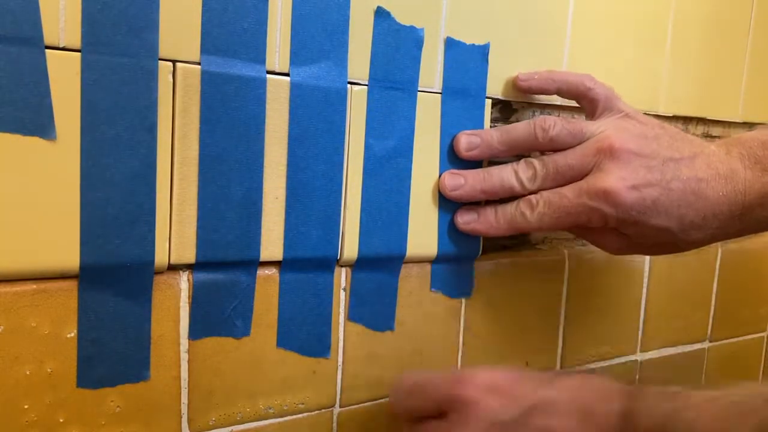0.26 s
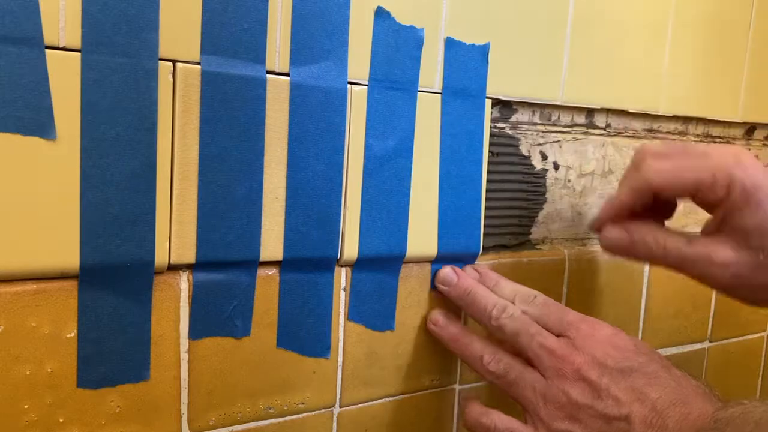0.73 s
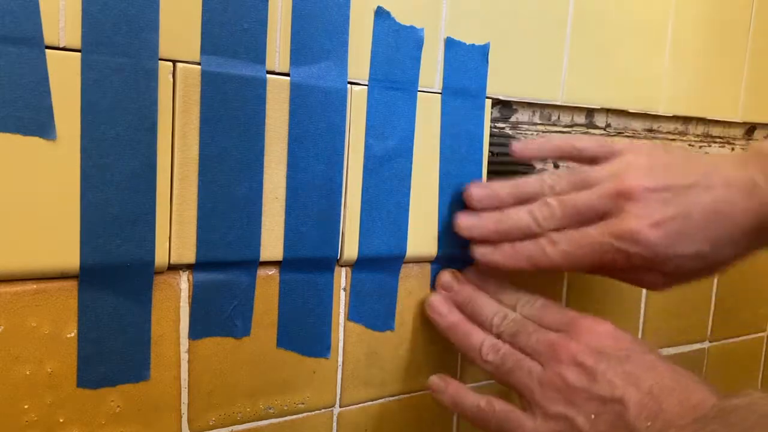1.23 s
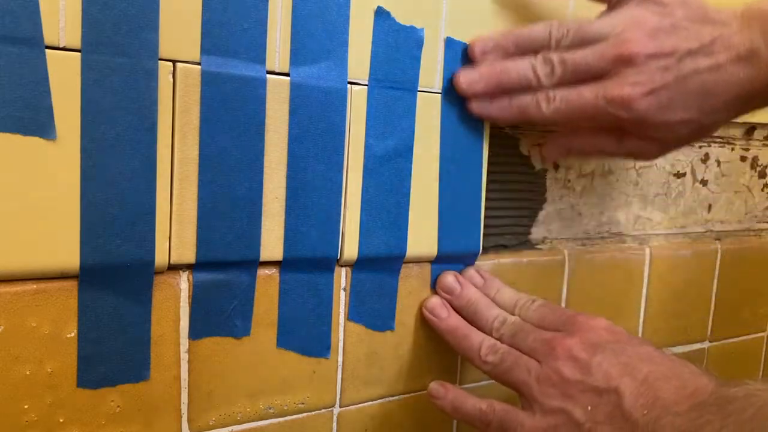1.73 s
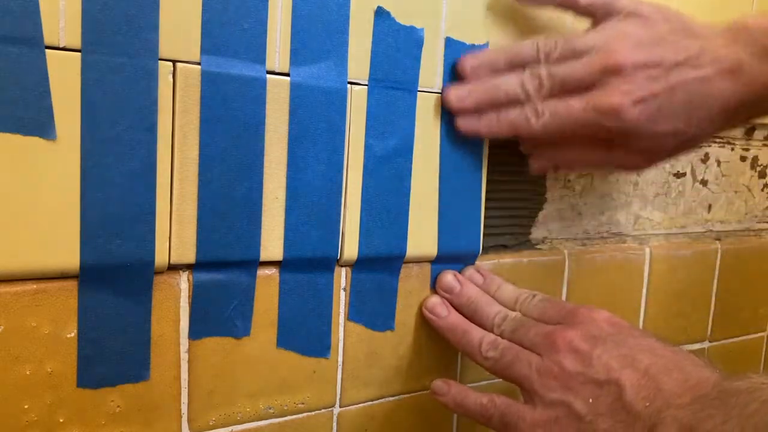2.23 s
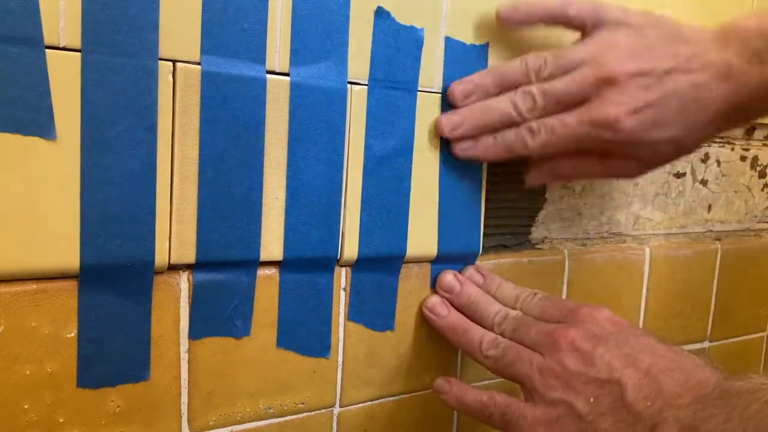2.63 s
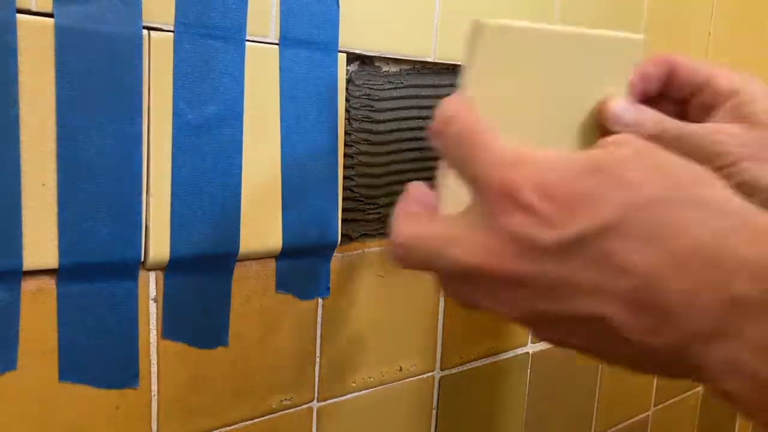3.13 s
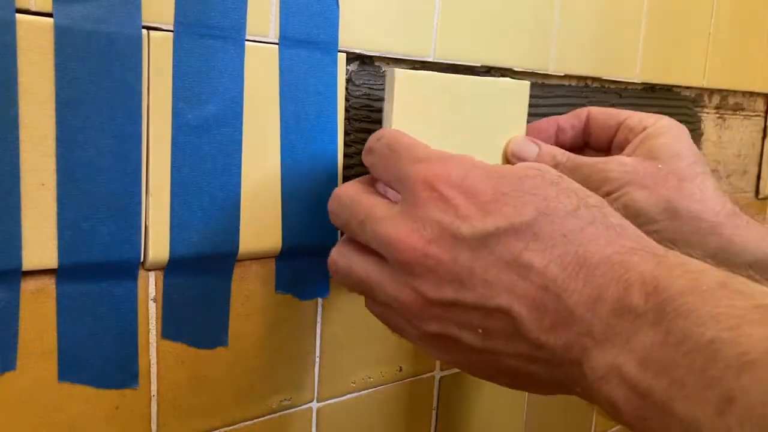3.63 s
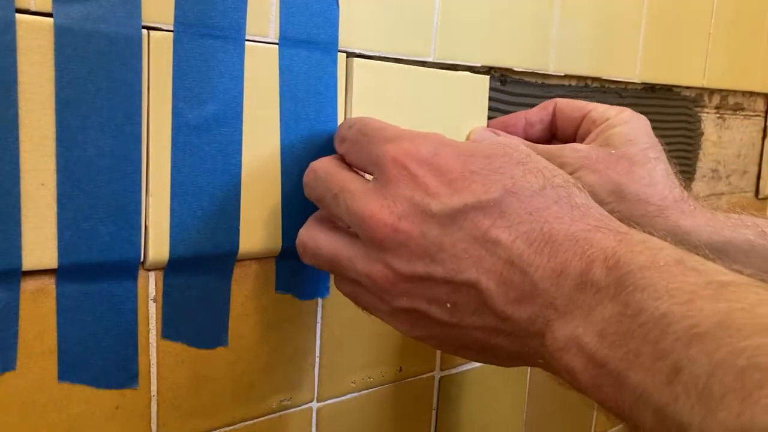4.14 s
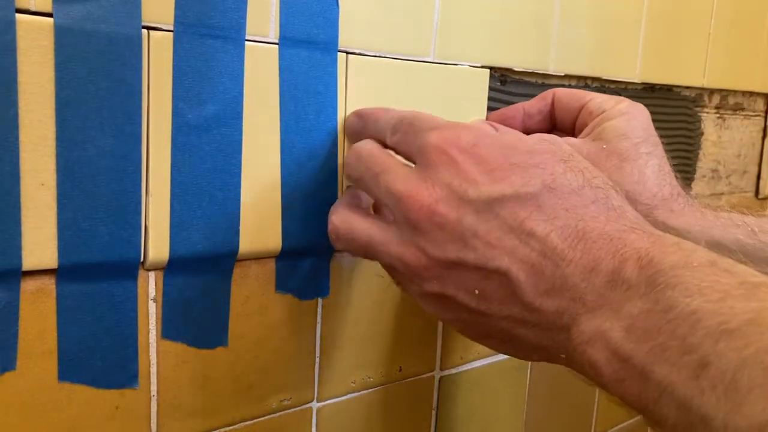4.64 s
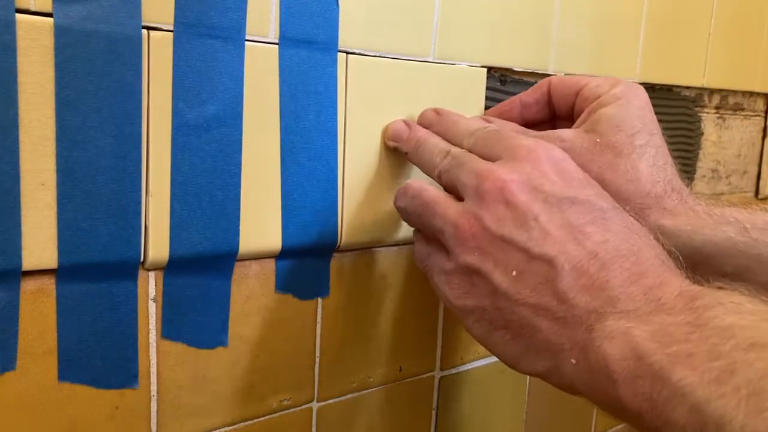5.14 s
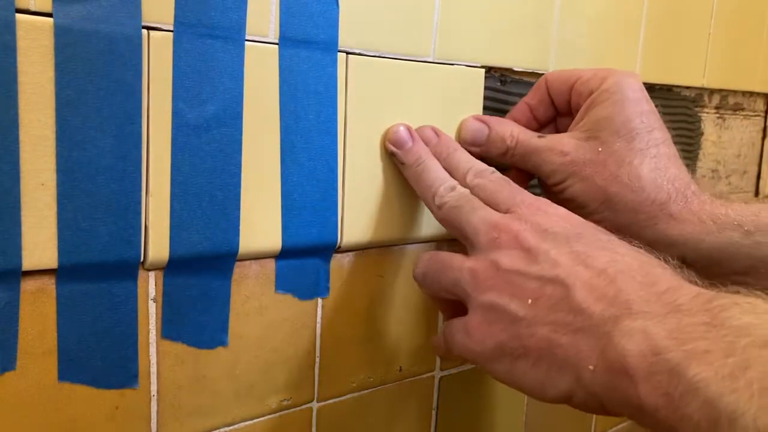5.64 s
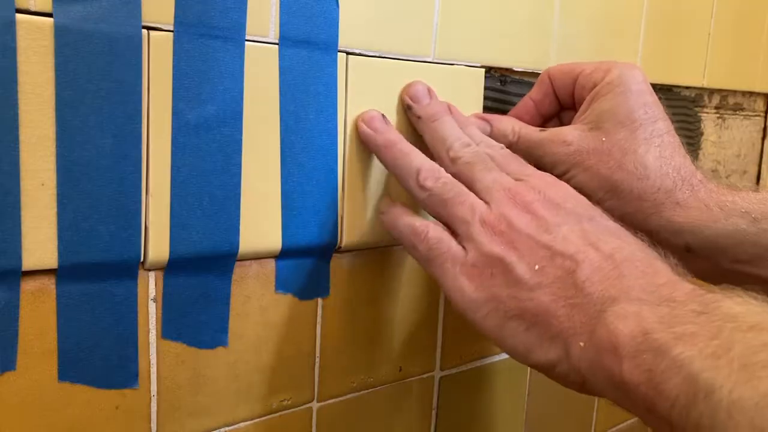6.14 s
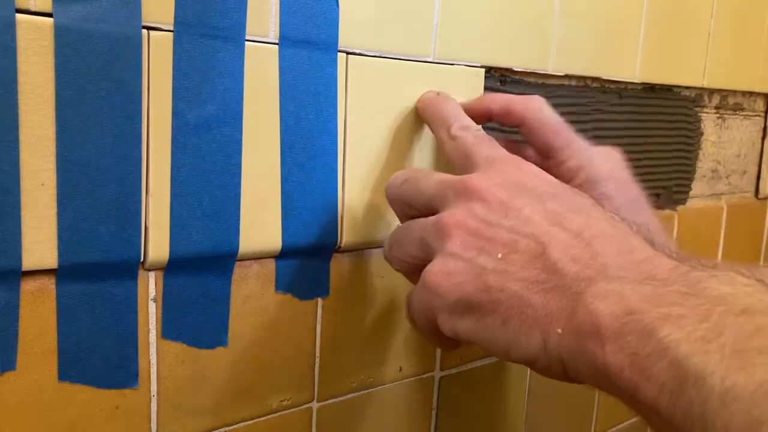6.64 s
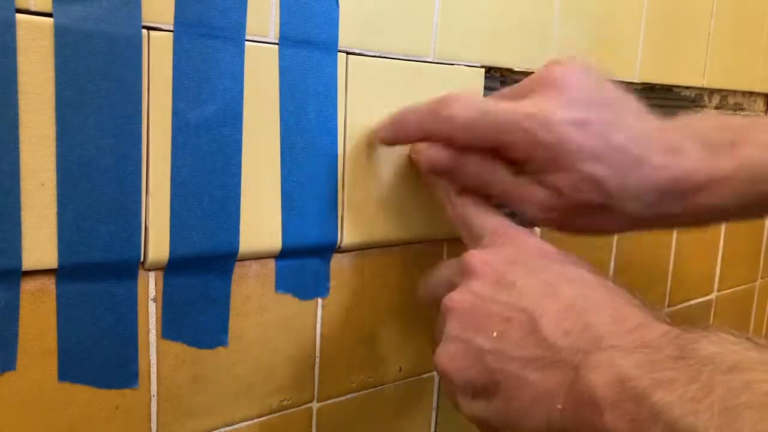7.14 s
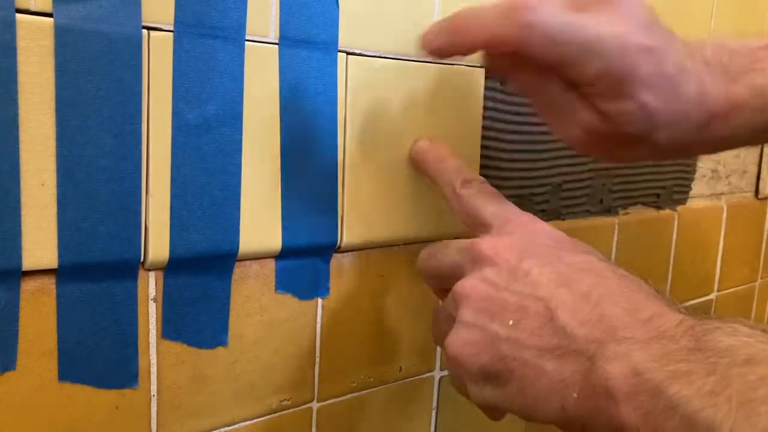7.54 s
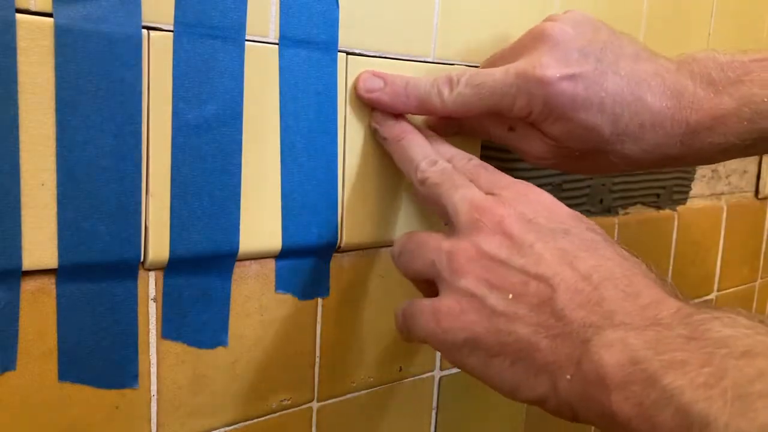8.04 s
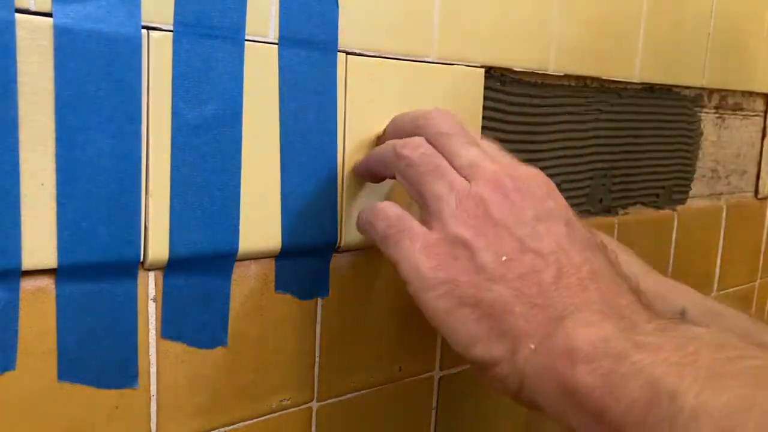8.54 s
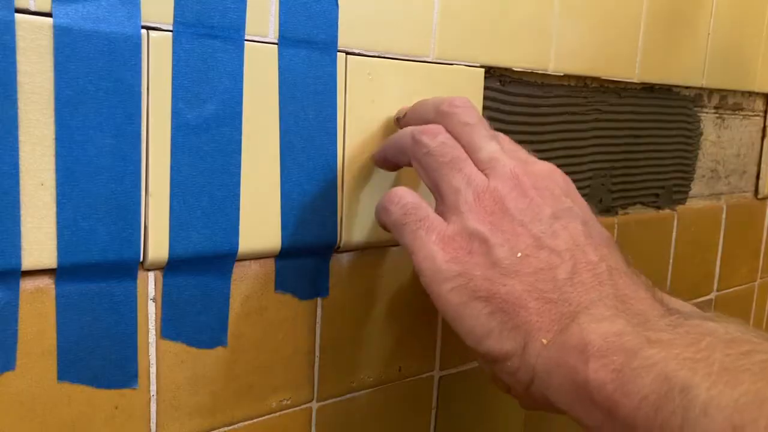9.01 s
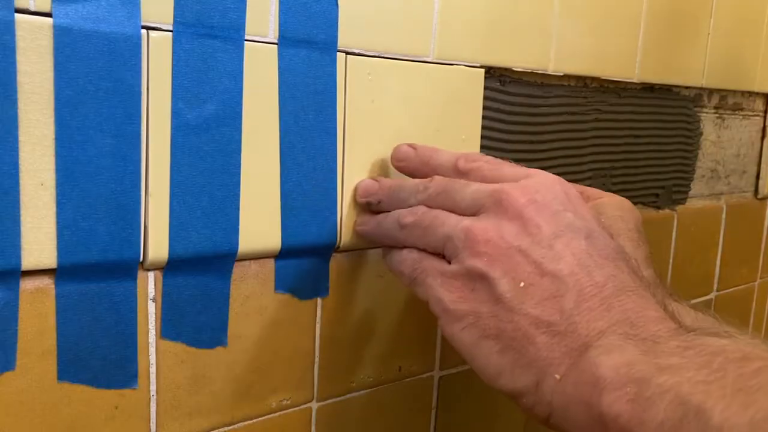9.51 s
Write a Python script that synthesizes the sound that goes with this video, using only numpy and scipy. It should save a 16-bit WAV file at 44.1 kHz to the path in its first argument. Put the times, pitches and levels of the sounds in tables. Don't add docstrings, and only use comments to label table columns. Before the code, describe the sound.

Close by in a small hard-walled room, hands press and stroke paper tape on wall tiles with dry swishes, faint sticky clicks and dull palm shoves. A tile is pressed home almost silently. Then knuckles rap it sharply, four fast blows and seven more, followed by a few finger taps. A low fan hum and rumble runs throughout, changing abruptly at each scene cut.

```python
import sys
import numpy as np
from scipy import signal
from scipy.fft import rfft, irfft, next_fast_len
from scipy.io import wavfile
from scipy.ndimage import uniform_filter1d

SR = 44100
rng = np.random.default_rng(int(sys.argv[2]) if len(sys.argv) > 2 else 0)


def to_wav(s):
    ch = np.atleast_2d(s).T
    pcm = np.round(np.clip(ch, -1, 1) * 32767)
    wavfile.write(sys.argv[1], SR, pcm.astype(np.int16))


def volts(x):
    e = np.asarray(x, float) / 20
    return 10 ** e


N = 430857
TIME = np.arange(N) / SR

CUTS_S = [0, .822, 2.728, 5.625, 9.78]
# frequency in Hz, rms level in dB.
MOTOR_LINES = [
    [(107.7, -51), (161.5, -63), (317.6, -58.5), (425.3, -66.5), (554.5, -62.5)],
    [(53.8, -50.5), (166.9, -60), (215.3, -64), (300, -67)],
    [(118.4, -51), (166.9, -55.5), (290.7, -73), (349.9, -76.5), (468.3, -81), (527.6, -86.5), (721.4, -94)],
    [(53.8, -69), (107.7, -51.5), (161.5, -48), (274.5, -65.5), (328.4, -63.5), (479.1, -83.5),
     (543.7, -74.5)],
]
# frequency in Hz, density in dB per Hz.
AIR_SPECTRA = [
    [(15, -44), (25, -17), (59, -16), (108, -2), (206, -9), (335, -9), (384, -17), (560, -13), (796, -20.5),
     (1160, -28), (1370, -36), (14400, -58.5), (16000, -66)],
    [(15, -51), (25, -15), (70, -0.5), (249, -13.5), (301, -9.5), (695, -34), (988, -36), (2110, -44.5),
     (4250, -52), (7920, -61), (9070, -63), (11600, -54), (16000, -94)],
    [(15, -52), (25, -34), (64, 0), (102, -10), (170, 6), (195, -8), (229, -12), (344, -12.5), (416, -25),
     (463, -18), (796, -31.5), (8590, -45.5), (16000, -50)],
    [(15, -51), (25, -26.5), (55, -18.5), (97, -5), (166, -6.5), (223, -15), (335, -18.5), (405, -26),
     (545, -25.5), (863, -38), (1100, -39), (14400, -56), (16000, -78.5)],
]
# rms level in dB, one per stretch.
AIR_LEVELS_DB = [-51, -49.5, -57.5, -55]
# frequency in Hz, one per stretch.
RUMBLE_EDGES_HZ = [45, 22, 48, 45.5]
# time in seconds, level in dB.
BOOM_SWELL = [(.8, -57), (1.05, -53.5), (1.25, -58), (1.9, -60.5), (2.05, -51), (2.3, -57.5), (2.6, -55),
              (2.9, -58.5), (3.37, -54.5), (3.76, -54.5), (4.28, -52), (5.31, -47), (5.62, -50.5),
              (5.84, -50.5), (6.14, -66), (6.4, -54), (6.62, -47.5), (7.85, -49.5), (8.06, -57),
              (8.36, -44), (8.56, -55.5), (8.93, -43), (9.24, -44), (9.49, -54), (9.77, -47.5)]
# frequency in Hz, one per stretch.
BOOM_LINES_HZ = [156, 166, 166.2, 164.4]
# share of its dB, one per stretch.
BOOM_FOLLOW = [0, 0.14, 1, 0.034]
BOOM_FLUTTER_DB = 4

# frequency in Hz, density in dB per Hz.
SKIN_SPECTRA = [
    [(240, -27), (400, -4.5), (814, -6.5), (1030, -3), (1350, -4), (2360, -1.5), (3120, -8.5), (3810, -3.5),
     (5430, -11.5), (6740, 1), (9040, -1.5), (9760, -8.5), (12100, -19.5), (13900, -36), (16000, -10)],
    [(240, -68), (400, -10), (536, -11.5), (742, -15.5), (921, -9.5), (1330, -1.5), (2710, 4.5), (15000, 5),
     (16000, 1)],
]
# start in seconds, length in seconds, hiss in dB,
# fine top in dB re hiss, drag of the tile body in dB re hiss.
HAND_SLIDES = [(.08, 0.33, -65, -7, 2), (.3, 0.37, -81, -8, 15), (.87, 0.27, -70, -8, 0),
               (1.15, 0.31, -77, -14, 7), (1.3, 0.49, -58.5, -1, 2.5), (1.5, 0.38, -53.5, 3, 5),
               (1.68, 0.24, -51.5, -2, 4.5), (1.91, 0.081, -70, -1, 3), (2.04, 0.35, -77, -3, 11),
               (2.17, 0.31, -45.5, 3, 2.5), (2.63, 0.11, -59.5, -5, 0), (2.68, 0.11, -48, 2.5, -1),
               (2.8, 0.27, -63, -10, 3.5), (2.93, 0.4, -64.5, -7, 1), (3.25, 0.37, -77.5, -3, 6),
               (3.56, 0.23, -61.5, -4.5, -5), (3.745, 0.18, -59, -6, -6), (4.47, 0.072, -75, -15, 8),
               (4.58, 0.16, -69.5, -18, 4), (5.88, 0.13, -70, -11, 12), (5.94, 0.16, -59, -5, -13),
               (6.26, 0.1, -67, -6, -7), (6.47, 0.16, -75, -6, 10.5), (7.9, 0.23, -77.5, -16, 10),
               (8.27, 0.42, -66.5, -11, 11.5)]
# start in seconds, length in seconds, hiss in dB,
# fine top in dB re hiss, drag of the tile body in dB re hiss.
SKIN_LANDINGS = [(.052, 0.092, -54, 0, -5), (.245, 0.037, -57, -3, -21), (2.9, 0.052, -49, -14, 4),
                 (3.405, 0.022, -63, -8, -5), (4.74, 0.12, -70, -11, 9), (4.915, 0.035, -65, -3, -1),
                 (6.195, 0.052, -65, -6, 2), (5.315, 0.065, -69, -5, 12), (5.622, 0.12, -57, -14, 11),
                 (7.815, 0.059, -76, -28, 39), (8.065, 0.058, -71, -29.5, 30.5),
                 (8.358, 0.031, -74, -25, -27), (8.715, 0.077, -86, -27, 29)]
SLIDE_RISE, SLIDE_LIFT = 0.23, 0.39
LANDING_RISE, LANDING_FADE_DB = 0.18, 8.5
# low edge in Hz, high edge in Hz, level in dB re hiss.
GRIT_BAND = (1140, 4000, -5.5)
# frequency in Hz, width in Hz, level in dB.
TILE_HOLLOWS = [(612, 65, -0.5), (786, 40, 2), (956, 33, -6), (1330, 40, -4.5)]
HOLLOW_DB, HOLLOW_PATCH_DB = -1.5, 7.5
# start in seconds, length in seconds, level in dB,
# centre in Hz, spread as a frequency ratio.
GLUE_SNAPS = [(0.057, 0.0058, -48, 3480, 2.1), (0.071, 0.0069, -52, 3500, 2.3),
              (0.072, 0.012, -60, 2900, 1), (0.093, 0.0043, -49, 3540, 2.6),
              (0.096, 0.0098, -49, 1860, 1.03), (0.253, 0.015, -47.5, 1770, 1.06),
              (.26, 0.012, -50, 2010, 1.16), (.261, 0.016, -56, 2920, 1.08),
              (2.182, 0.022, -45.5, 385, 0.75), (2.867, 0.019, -61, 1900, 1.07),
              (2.883, 0.019, -61, 1560, 0.87), (2.912, 0.017, -51.5, 1850, 1.13),
              (2.913, .016, -59, 3550, 0.87), (2.923, .012, -62, 1560, 0.91), (2.942, .006, -57, 3000, 1.5),
              (3.055, 0.013, -70, 2500, 1.3), (3.071, 0.0076, -56.5, 2620, 1.26),
              (3.097, 0.0052, -65, 3200, 1.4), (4.054, 0.66, -71, 505, 1.18),
              (4.652, .006, -44, 14800, 1.04), (4.663, .012, -51, 14400, 0.88),
              (5.72, 0.17, -66.5, 482, 0.86), (5.608, .007, -69, 3000, 1.6),
              (5.625, 0.061, -56.5, 2350, 1.27), (5.641, 0.035, -57, 1300, 1.03),
              (7.815, 0.029, -56, 2720, 0.87), (7.968, 0.011, -64, 1004, 1.1),
              (8.063, 0.016, -46, 1250, 1.15), (8.067, 0.033, -43.5, 760, 1.15),
              (8.087, 0.039, -44.5, 537, 1.09), (8.122, 0.016, -48, 1190, 1.2),
              (8.124, .008, -62, 2580, 1.1), (8.361, 0.01, -45.5, 2110, 1.17),
              (8.359, 0.03, -49, 3200, 1.6), (8.4, 0.24, -64.5, 2000, 1.74),
              (8.722, 0.0051, -60, 2200, 1.3), (4.652, 0.005, -50, 2500, 2.7),
              (4.62, .008, -64, 3500, 1.04), (.27, .03, -60, 2000, 1.26)]
# start in seconds, length in seconds, level in dB,
# centre in Hz, spread as a frequency ratio.
PALM_SHOVES = [(.83, 0.09, -49, 83.4, 0.83), (1.31, .07, -52, 63, 1.04), (1.385, 0.079, -48, 162, 1.05),
               (1.84, .08, -52, 85, 1), (2.14, 0.077, -52, 59, 1.24), (2.48, 0.085, -52, 75, 1.3),
               (2.62, 0.1, -42.5, 70.6, 1.4), (2.691, 0.048, -46.5, 238, 1.15),
               (4.61, 0.05, -52.5, 321, 1.12), (5.633, 0.063, -46, 123, 1.33), (5.74, 0.19, -54, 315, 0.74),
               (8.085, 0.025, -40, 135, 1.13)]
STROKE, BIGGEST_SLIP = 0.22, 6

# time in seconds, crack in dB, crack pitch in Hz,
# tile body in dB re crack, tick in dB re crack.
FINGER_TOUCHES = [(0.099, -42.5, 1790, -13, 2.5), (0.1035, -41.5, 900, 6.5, -25),
                  (0.258, -52, 1940, -32, -11), (0.846, -58.5, 970, -11, -3), (0.944, -56.5, 880, -7, -4),
                  (1.4074, -65, 1350, 12, 5), (2.194, -53.5, 935, 7, 8), (2.942, -49, 2040, -16, -7),
                  (3.073, -53, 2000, -32, -7), (4.6208, -44.5, 1430, -4, -10),
                  (4.6516, -39.5, 1560, -5.5, -0.5), (5.61, -55.5, 2100, 1, -8), (5.629, -46, 2500, -7, -6),
                  (6.381, -55, 1360, -23, -4), (7.821, -34.5, 1140, -9, -22.5),
                  (7.9661, -60.5, 934, 8.5, -22), (8.069, -29.5, 1110, -17.5, -23.5),
                  (8.1269, -40.5, 920, -13, -39), (8.3626, -41.5, 2300, -23, -13),
                  (8.7187, -37.5, 1330, -12, -44)]
TOUCH_BOOM_DB = 3.5
# time in seconds, crack in dB.
PALM_THUMPS = [
    (0.1032, -50),
    (4.7493, -66),
    (5.3187, -63),
    (5.6348, -57.5),
    (6.561, -56.5),
    (7.045, -51.5),
]
THUMP_HZ, THUMP_BOOM_DB, THUMP_BODY_DB, THUMP_TICK_DB = 1270, 24.5, 3, -12.5
# time in seconds, crack in dB, then wall boom, tile middle and tick in dB re crack.
KNUCKLE_RAPS = [(6.6687, -12.5, 1, -12.5, -24), (6.7595, -5.5, 0, -18.5, -22),
                (6.852, -5, -1, -17.5, -24.5), (6.936, -5.5, -2.5, -15.5, -29.5),
                (7.1651, -15, -7, -7.5, -21), (7.261, -12.5, -3, -12.5, -24), (7.352, -9.5, -5, -13.5, -18),
                (7.439, -7, -8, -14, -11), (7.531, -5, -12, -15, -13.5), (7.6192, -5.5, -9.5, -15.5, -10.5),
                (7.7042, -15.5, -2, -11, -12)]
# frequency in Hz, level in dB, t60 in seconds.
WALL_MODES = [
    [(128, -5.5, 0.16), (159.2, 1, 0.16), (222.6, -18, 0.3), (296, -21, 0.27), (318.7, -7.5, 0.096),
     (429, -16, 0.079), (458, -24, 0.34), (525, -22.5, 0.12), (568, -20.5, 0.131), (651.6, -28, 0.15),
     (711, -16.5, 0.06), (760, -25.5, 0.066), (1130, -30, 0.075), (1213, -16.5, 0.07), (1346, -26.5, 0.06),
     (1578, -20.5, .05), (1776, -32.5, .05), (2000, -32, .05), (2090, -27.5, 0.05), (880, -39.5, .2),
     (1440, -26.5, .05), (75, -20.5, .1)],
    [(110.5, 1, 0.13), (159.9, 9, 0.15), (226.2, -17, 0.18), (297, -10.5, 0.18), (335, -15, 0.087),
     (432, -15.5, 0.083), (475.5, -18.5, 0.15), (520, -15, 0.12), (581, -16.5, 0.16), (669, -26, 0.17),
     (725, -10, 0.074), (880, -38, 0.3), (1110, -31, .08), (1217, -15.5, 0.06), (1300, -20.5, 0.065),
     (1380, -23.5, 0.058), (1576, -26, 0.05), (1686, -28.5, 0.035), (2107, -35, 0.04), (2295, -31, 0.04),
     (1530, -27.5, .04), (65, -8, .12)],
]
# level in dB re tile middle, one per spot.
SECOND_MODE_DB = [-2.5, 7.5]
# frequency in Hz, width in Hz, level in dB,
# lead of the left microphone in radians.
CRACK_MODES = [
    [(1372, 370, -3.5, 2.04), (1790, 1100, -6.5, 2.5), (2110, 180, -23, 4), (4170, 970, -11, 1),
     (6300, 3400, 4, 4), (8450, 2000, -9.5, -3), (14860, 2500, -0.5, 0.7)],
    [(1360, 700, -4.5, 1.74), (2040, 330, -12.5, 2.5), (2370, 300, -14, 4), (2710, 310, -12, 4),
     (3618, 400, -9, -1), (4466, 440, -9.5, 1.5), (6360, 1000, -3, 1.3), (8700, 2200, -4, -1.2),
     (14500, 2200, 8, -0.7), (5600, 600, -10.5, -1.5)],
]
# frequency in Hz, t60 in seconds, level in dB.
ROOM_BANDS = [(500, 0.23, -23.5), (680, .16, -22), (900, 0.2, -32.5), (1169, 0.16, -21), (1420, 0.09, -16),
              (1750, 0.09, -24.5), (2100, 0.12, -28), (2900, 0.1, -20.5), (4150, 0.1, -22),
              (5900, 0.095, -16.5), (7400, .1, -17.5), (8600, 0.087, -15.5), (12500, 0.033, -11.5),
              (14600, .07, -18)]
MOVE_S = 7.1
BEAT_HZ, BEAT_DEPTH = 27.3, .6
SCUFF_S, SCUFF_SHARE = 0.015, 0.98
FORE_S, FORE_DB = .006, -21
THIN_DB = -10.5
WALL_CREST_S = .0098
CONTACT_S, TILE_LEAD = .0013, 1.15

# time in seconds, level in dB.
GLUE_TICKS = [(0.5327, -64), (0.1013, -37.5), (1.1638, -64), (5.61, -62), (6.385, -65), (4.621, -58),
              (4.652, -56), (4.665, -61), (4.743, -65), (4.772, -66), (7.301, -74), (7.9987, -57)]
# frequency in Hz, mean half width in Hz, wander in Hz,
# start in seconds, end in seconds.
SPECTRAL_GAPS = [(2700, 70, 40, 1.415, 1.445), (3050, 40, 60, 1.42, 1.63), (5200, 170, 150, 1.44, 1.6),
                 (5450, 200, 120, 2.205, 2.325), (5450, 150, 40, 2.37, 2.4), (5850, 0, 80, 1.64, 2),
                 (9100, 480, 260, .822, 2.728), (13750, 600, 130, .822, 2.728)]

NEAR_LEFT = np.array([[.5], [-.5]])


def unit(x):
    return x / np.sqrt(np.mean(x ** 2))


def band(x, lo_hz, hi_hz):
    return signal.sosfilt(signal.butter(2, [lo_hz, min(hi_hz, .45 * SR)], "band", fs=SR, output="sos"), x)


def walk(rate, part=slice(0, N)):
    k = int(SR / rate)
    held = np.repeat(rng.standard_normal(N // k + 1), k)[part]
    return 0.64 * uniform_filter1d(uniform_filter1d(held, k), k)


def pair(length, alike_hz):
    size = next_fast_len(length)
    mid, side = rfft(rng.standard_normal((2, size)))
    apart = 1 / (1 + (alike_hz / np.linspace(1, SR / 2, len(mid))) ** 2)
    both = np.array([mid + apart * side, mid - apart * side]) / np.sqrt(1 + apart ** 2)
    return irfft(both, size)[:, :length]


def colour(x, points):
    size = next_fast_len(x.shape[-1])
    hz, db = np.transpose(points)
    gain = volts(np.interp(np.log(np.linspace(1, SR / 2, size // 2 + 1)), np.log(hz), db))
    return irfft(rfft(x, size) * gain, size)[..., :x.shape[-1]]


def during(t0, t1):
    return np.clip((TIME - t0) / .003 + .5, 0, 1) * np.clip((t1 - TIME) / .003 + .5, 0, 1)


def fan():
    out = np.zeros((2, N))
    gust, flutter = walk(3), walk(9)
    lag = np.array([[-.08], [.08]])
    stretches = zip(CUTS_S, CUTS_S[1:], MOTOR_LINES, AIR_SPECTRA, AIR_LEVELS_DB, BOOM_LINES_HZ,
                    RUMBLE_EDGES_HZ, BOOM_FOLLOW)
    for t0, t1, lines, air, air_db, boom_hz, edge_hz, follow in stretches:
        part = slice(max(int(t0 * SR) - 200, 0), min(int(t1 * SR) + 200, N))
        t = TIME[part]
        rumble = band(unit(colour(pair(len(t), 540), air)), edge_hz, SR)
        sound = rumble * volts(air_db + 3.5 * gust[part] + flutter[part])
        boom_db = np.interp(t, *np.transpose(BOOM_SWELL)) - 1
        swell_db = follow * (boom_db - boom_db.mean())
        boom_db = boom_db + BOOM_FLUTTER_DB * flutter[::-1][part]
        others = [row for row in lines if abs(row[0] - boom_hz) > 12]
        for hz, line_db in [(boom_hz, boom_db)] + others:
            level = np.sqrt(2) * volts(line_db + swell_db * (hz > 250) + .9 * walk(4, part))
            sound += level * np.sin(2 * np.pi * hz * t + .3 * walk(5, part) - lag)
        out[:, part] += sound * during(t0 - (t0 == 0), t1)[part]
    return out * volts(-NEAR_LEFT)


def hand_pressure(u, lands):
    if lands:
        fade = volts(-LANDING_FADE_DB * u / 2) * np.sqrt(np.maximum(1 - u, 0))
        return np.minimum(u / LANDING_RISE, 1) * fade
    return np.clip(np.minimum(u / SLIDE_RISE, (1 - u) / SLIDE_LIFT), 0, 1)


def rubbing():
    strength_db = 2.2 * np.minimum(rng.exponential(size=N), BIGGEST_SLIP) + 1.8 * walk(70)
    slips = pair(N, 410) * volts(strength_db)
    hiss_patch, top_patch, drag_patch = walk(35), walk(40), 3 * walk(40)
    out = np.zeros((2, N))
    rubs = [(*row, False) for row in HAND_SLIDES] + [(*row, True) for row in SKIN_LANDINGS]
    for s, length, hiss_db, top_db, drag_db, lands in rubs:
        part = slice(int(s * SR), int((s + length) * SR))
        pressure = hand_pressure((TIME[part] - s) / length, lands)
        cut = min(c for c in CUTS_S if c > s + length / 4)
        on_tape = CUTS_S[1] < s < CUTS_S[2]
        patch = top_patch[part]
        x = colour(slips[:, part], SKIN_SPECTRA[0 if on_tape else 1])
        hiss = unit(band(x, 1700, 8800)) * volts(hiss_patch[part] - 1)
        hiss = hiss + STROKE * patch * unit(band(x, 2200, 4600))
        top = unit(band(x, 11000, 14700)) * volts(top_db + patch)
        drag = unit(band(x, 430, 947)) * volts(drag_db - 7.5 + drag_patch[part])
        if on_tape:
            for k, (hz, width, db) in enumerate(TILE_HOLLOWS):
                hollow_db = HOLLOW_DB + db + HOLLOW_PATCH_DB * np.roll(top_patch, k * SR)[part]
                hollow = unit(band(x, hz - width / 2, hz + width / 2))
                drag = drag + hollow * volts(drag_db - 14.5 + hollow_db)
        if lands:
            lo_hz, hi_hz, grit_db = GRIT_BAND
            hiss = hiss + unit(band(x, lo_hz, hi_hz)) * volts(grit_db + patch)
        out[:, part] += volts(hiss_db) * pressure ** 2 * (hiss + top + drag) * (TIME[part] < cut)
    return out + snaps_and_shoves(slips)


def snaps_and_shoves(slips):
    out = np.zeros((2, N))
    for s, length, db, hz, spread in GLUE_SNAPS + PALM_SHOVES:
        part = slice(int(s * SR), int((s + length) * SR))
        spread = max(spread, 1.02)
        run_in = slips[:, part.start - 999:part.stop]
        burst = unit(band(run_in, hz / spread, hz * spread))[:, 999:]
        out[:, part] += volts(db) * burst * np.sin(np.pi * ((TIME[part] - s) / length).clip(0, 1) ** .5)
    return out


def hardness(hz, tick_db, nail_db):
    return nail_db if hz > 12000 else tick_db * np.interp(hz, [2300, 3000, 4800, 6000], [0, .6, .6, 1])


def smear(x, tau_s):
    grit = rng.standard_normal(SR // 10) * np.exp(-TIME[:SR // 10] / tau_s)
    return signal.fftconvolve(x, [grit / np.sqrt(np.sum(grit ** 2))])


def room_tail(echo, t):
    tail = []
    for hz, t60, db in ROOM_BANDS:
        noise = unit(band(band(echo, hz / 1.16, hz * 1.14), hz / 1.16, hz * 1.14))
        tail.append(volts(db - 60 * t / t60) * (1 - np.exp(-t / 0.0019)) * noise)
    return tail


def contact_crack(spot, early, pitch, tick_db, nail_db, luck):
    crack = 0
    for k, (hz, width, part_db, ahead) in enumerate(CRACK_MODES[spot]):
        level = volts(part_db + hardness(hz, tick_db, nail_db) + 2 * luck[k + 9] * (k > 0))
        hz = hz if hz > 2500 else hz * pitch
        u = np.pi * width * pitch * early
        swell = (np.e * u / 2) ** 2 * np.exp(-u)
        crack = crack + level * swell * np.sin(2 * np.pi * hz * early + ahead * NEAR_LEFT)
    return crack


def wall_ring(spot, t, pitch, boom_db, second_db, middle_db, lead, luck, scatter):
    ring = 0
    for k, (hz, mode_db, t60) in enumerate(WALL_MODES[spot]):
        group_db = np.interp(hz, [164.0, 315, 574.6, 990], [boom_db, second_db + 12, middle_db + 15.0, 10])
        t60 = min(t60, 55 / hz + .01) if hz > 1150 else t60
        build = 1 - np.exp(-(t * hz / 1.8) ** 2)
        turn = min((hz / 750) ** 3, 1.2) * lead[spot, k] * NEAR_LEFT
        if hz < 350:
            detuned = 2 * np.pi * hz * (1 + 0.0044 * luck[k])
            phase = detuned * (t - WALL_CREST_S) + np.pi / 2 + turn
        elif hz > 1000:
            group_db += 2 * THIN_DB * max(pitch - 1, 0)
            together = 2 * np.pi * CRACK_MODES[spot][0][0] * CONTACT_S + TILE_LEAD * NEAR_LEFT
            phase = 2 * np.pi * hz * (1 + .004 * luck[k]) * (t - CONTACT_S) + together
        else:
            phase = 2 * np.pi * hz * (1 + 0.0031 * luck[k]) * t + 2.0 * lead[1 - spot, k] + turn
        if 400 < hz < 1150:
            beat = 2 * np.pi * BEAT_HZ * (1 + .25 * lead[spot, -k]) * t + .5 * luck[-k]
            build = build * (1 + BEAT_DEPTH * np.cos(beat))
        level = volts(mode_db + group_db + 1.5 * luck[k] - 60 * t / t60)
        ring = ring + level * build * np.sin(phase + scatter * luck[-k])
    return ring


def knocks(events, scatter, ring_db, wet_db, scuff, size):
    out, t = np.zeros((2, N + SR)), TIME[:size]
    early = t[:SR // 20]
    grit_len = SR // 10 - 1
    echoes = [pair(len(t), 900) for spot in WALL_MODES]
    tails = [room_tail(echo, t) for echo in echoes]
    lead = rng.standard_normal((2, 30))
    chance = rng.standard_normal((len(events), 30))
    for (s, db, pitch, boom_db, second_db, middle_db, tick_db, nail_db), luck in zip(events, chance):
        spot = int(s > MOVE_S)
        crack = contact_crack(spot, early, pitch, tick_db, nail_db, luck)
        fore = volts(db + FORE_DB) * smear(crack[:, ::-1], FORE_S)[:, ::-1]
        clean = np.pad(crack, ((0, 0), (0, grit_len)))
        crack = np.sqrt(1 - scuff) * clean + np.sqrt(scuff) * smear(crack, SCUFF_S)
        ring = wall_ring(spot, t, pitch, boom_db, second_db, middle_db, lead, luck, scatter)
        wet = 0
        for (hz, *_), part in zip(ROOM_BANDS, tails[spot]):
            thin_db = THIN_DB * max(pitch - 1, 0) * (hz < 1400)
            wet = wet + volts(hardness(hz, tick_db, nail_db) + thin_db) * part
        at = int(s * SR)
        out[:, at:at + len(t)] += volts(db) * (volts(ring_db) * ring * volts(-NEAR_LEFT) + volts(wet_db) * wet)
        out[:, at:at + crack.shape[1]] += volts(db) * crack
        lost = max(grit_len - at, 0)
        out[:, at + lost - grit_len:at + len(early)] += fore[:, lost:]
    return out[:, :N]


def ticks():
    shape, t = np.zeros(N), TIME[:SR // 10]
    for s, db in GLUE_TICKS:
        shape[int(s * SR):][:len(t)] += volts(db - 6 - 60 * t / .035)
    return shape * unit(band(pair(N, SR / 4), 9500, 16000))


def sparse_spectrum(x, grit):
    f, s, z = signal.stft(x, SR, nperseg=1024)
    f = f[:, None]
    at = np.minimum((s * SR).astype(int), N - 1)
    near = uniform_filter1d(abs(z), size=15, axis=1) + 1e-12
    z = z * np.where(f > 500, (abs(z) / near) ** grit, 1)
    faint = near[:, 330:360].mean(axis=1, keepdims=True) < volts(-118)
    z = z * ~((f > 14900) & faint)
    at = at // 2048 * 2048
    for hz, half, wander, t0, t1 in SPECTRAL_GAPS:
        clear = abs(f - hz - wander * walk(9)[at]) > half + wander * walk(20)[at]
        z = z * (clear | (s < t0) | (s > t1))
    return signal.istft(z, SR, nperseg=1024)[1][:, :N]


def scene():
    low_pass = signal.ellip(8, .2, 70, 15650, fs=SR, output="sos")
    steady = signal.sosfilt(low_pass, fan() + rubbing() + ticks())
    raps = [(s, db, 1, boom, tile + SECOND_MODE_DB[int(s > MOVE_S)], tile, tick, -28)
            for s, db, boom, tile, tick in KNUCKLE_RAPS]
    light = [(s, db, hz, body + TOUCH_BOOM_DB, body, tick) for s, db, hz, body, tick in FINGER_TOUCHES]
    light += [(s, db, THUMP_HZ, THUMP_BOOM_DB, THUMP_BODY_DB, THUMP_TICK_DB) for s, db in PALM_THUMPS]
    touches = [(s, db, hz / 1300, boom, body, body - 4, tick, 2 * tick - 14)
               for s, db, hz, boom, body, tick in light]
    soft = knocks(touches, scatter=1.49, ring_db=1.2, wet_db=4.1, scuff=SCUFF_SHARE, size=SR // 5)
    quiet = sparse_spectrum(steady + soft, 0.14)
    return quiet + knocks(raps, scatter=0.29, ring_db=0.09, wet_db=0.13, scuff=0, size=SR // 4)


def top_cut(x):
    return signal.sosfilt(signal.butter(12, 17010, fs=SR, output="sos"), x)


def record(dry):
    limited = dry / (1 + abs(dry / 0.97) ** 8) ** (1 / 8)
    mix = signal.sosfilt(signal.ellip(6, .3, 60, 16600, fs=SR, output="sos"), limited)
    return top_cut(mix)


dry = scene()
out = record(dry)
to_wav(out)
```